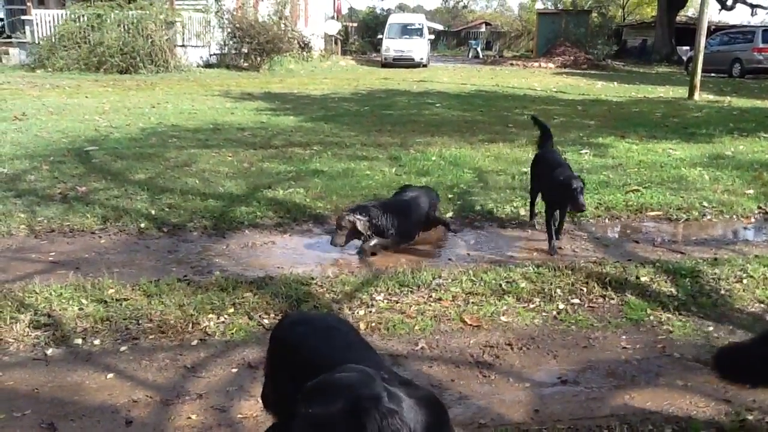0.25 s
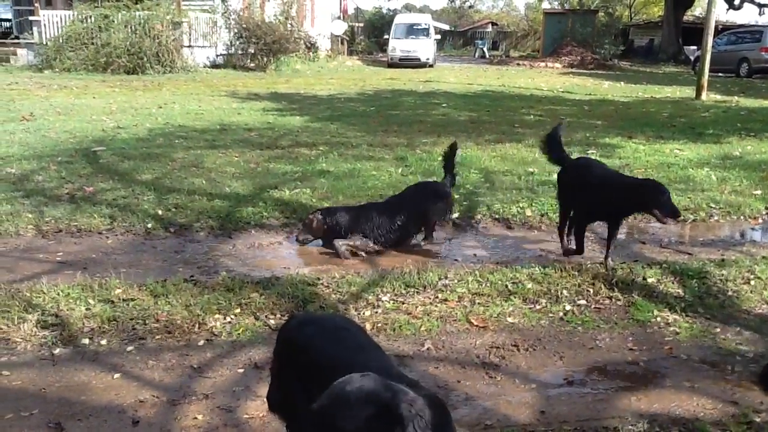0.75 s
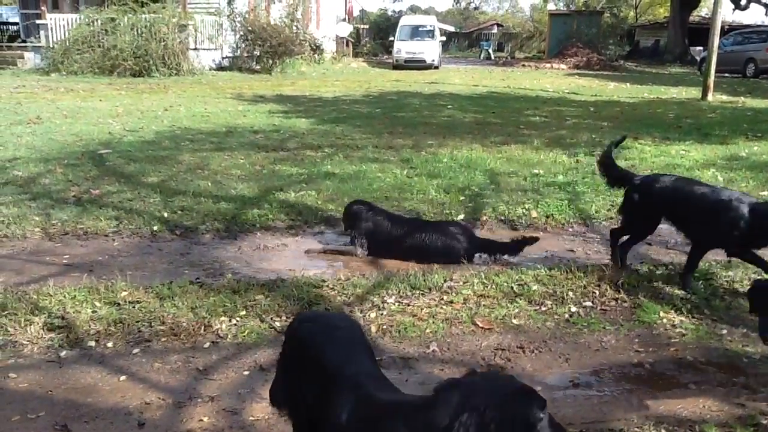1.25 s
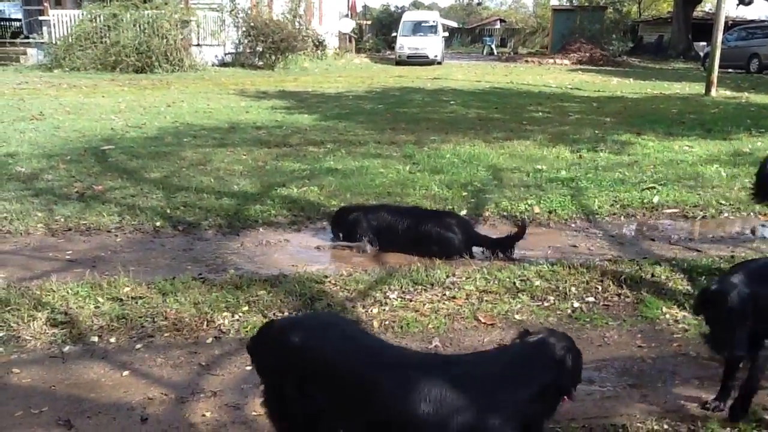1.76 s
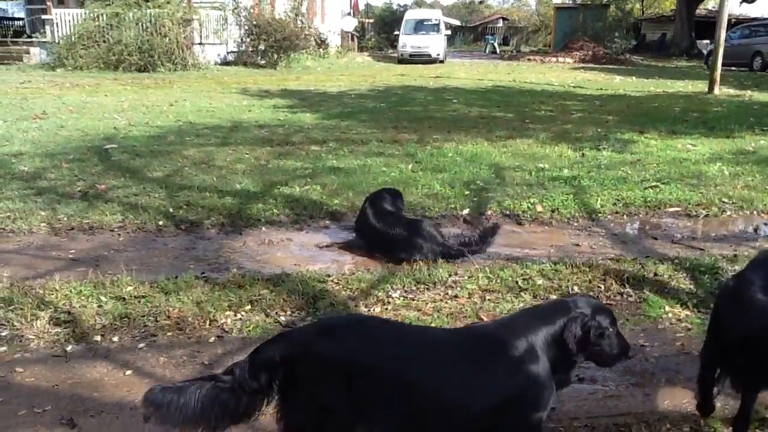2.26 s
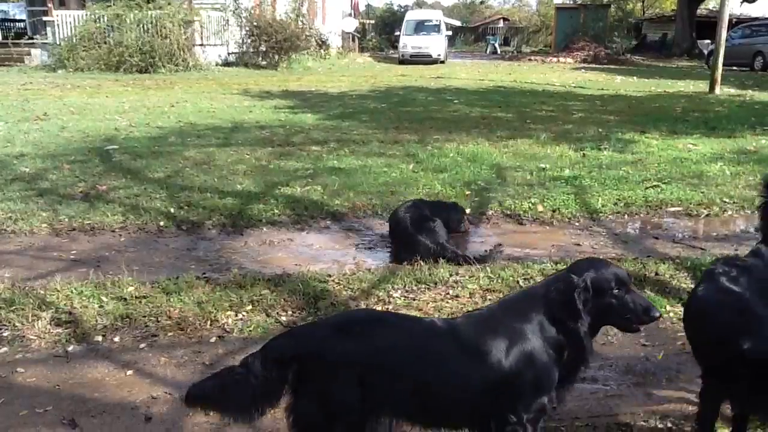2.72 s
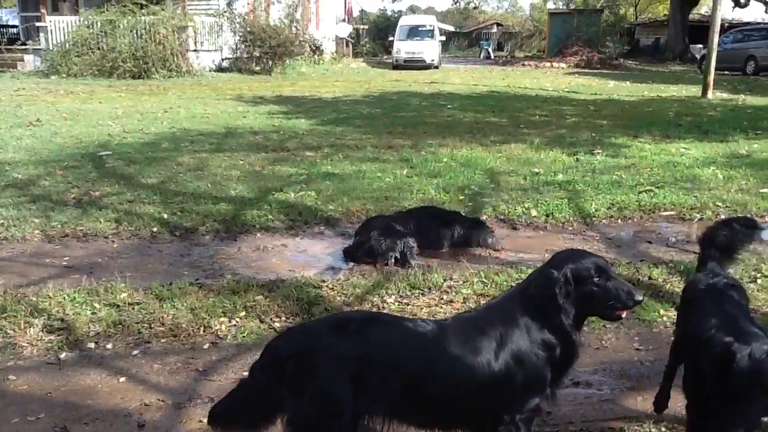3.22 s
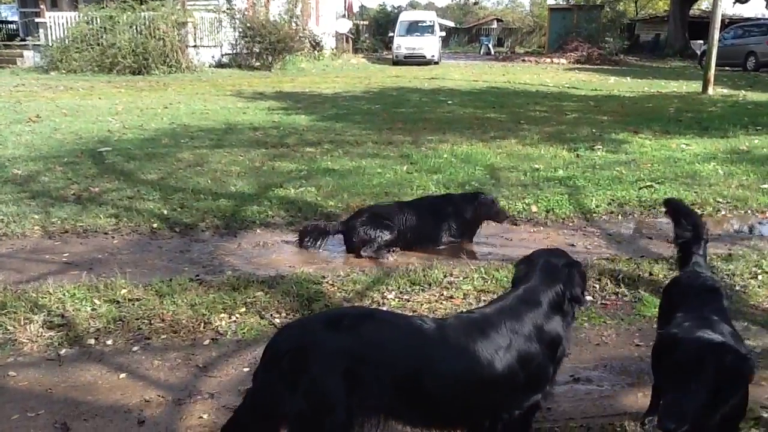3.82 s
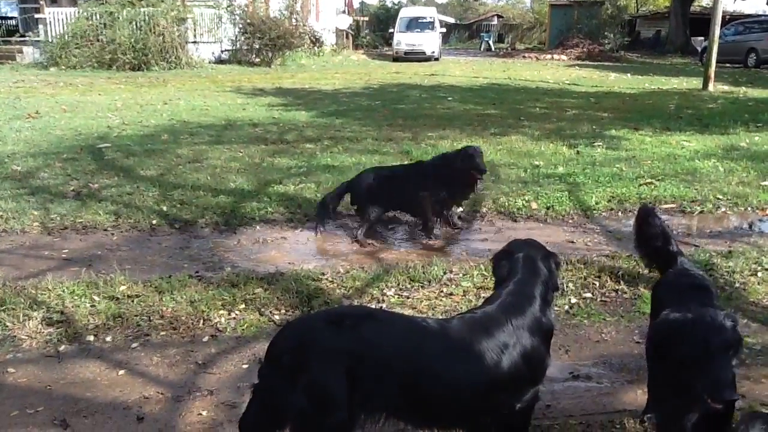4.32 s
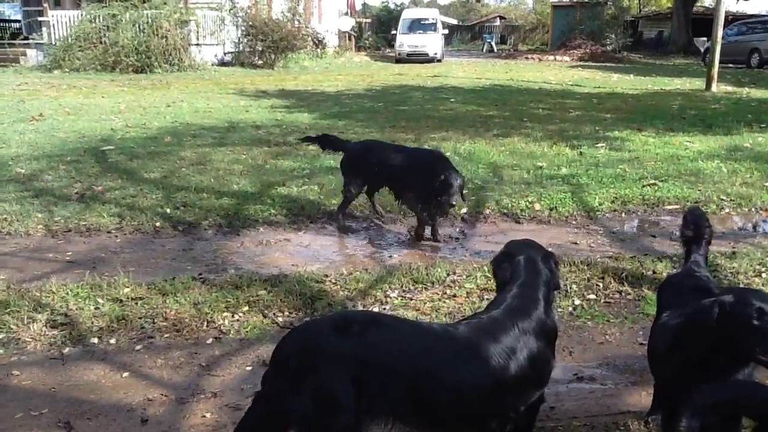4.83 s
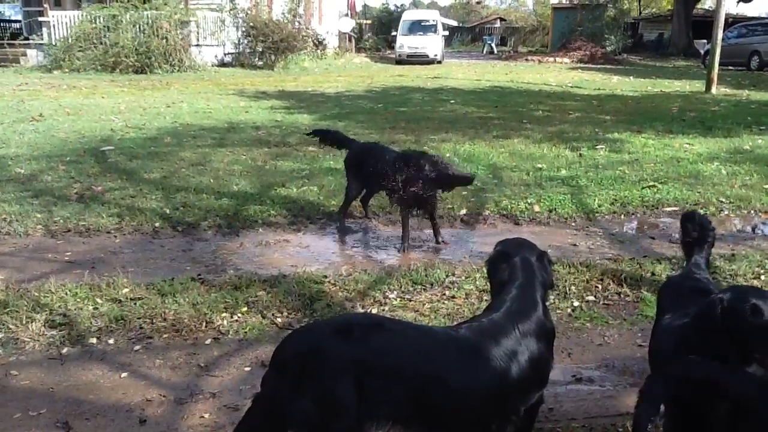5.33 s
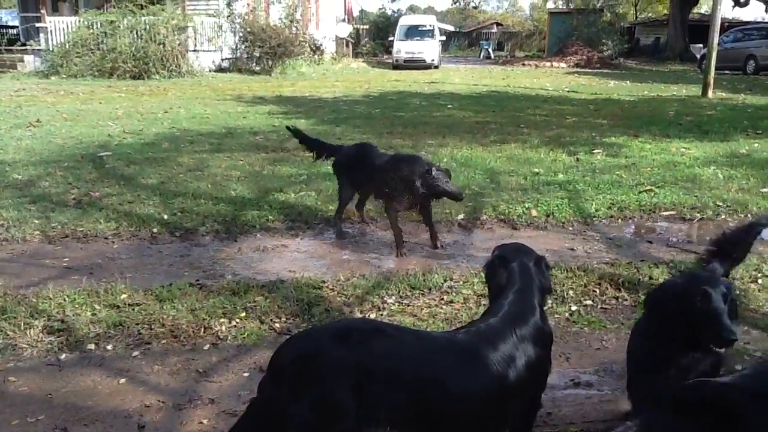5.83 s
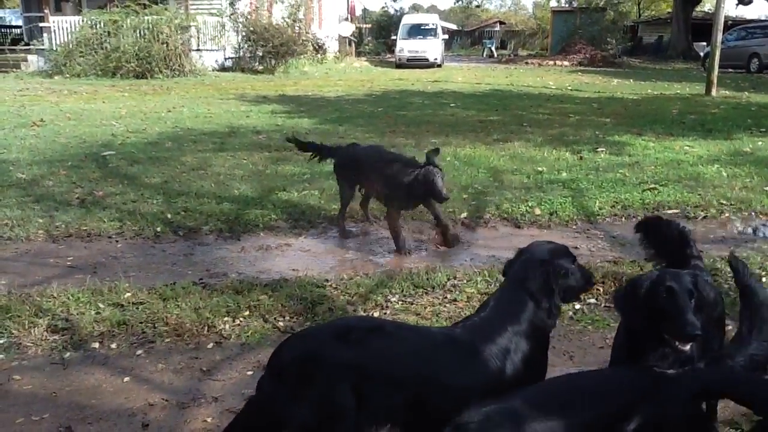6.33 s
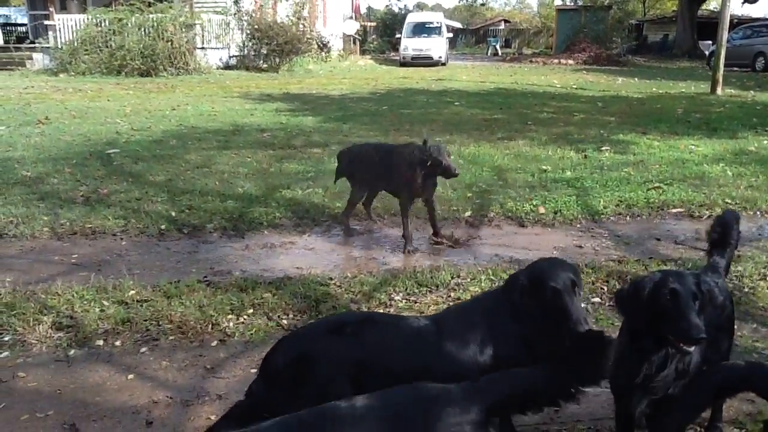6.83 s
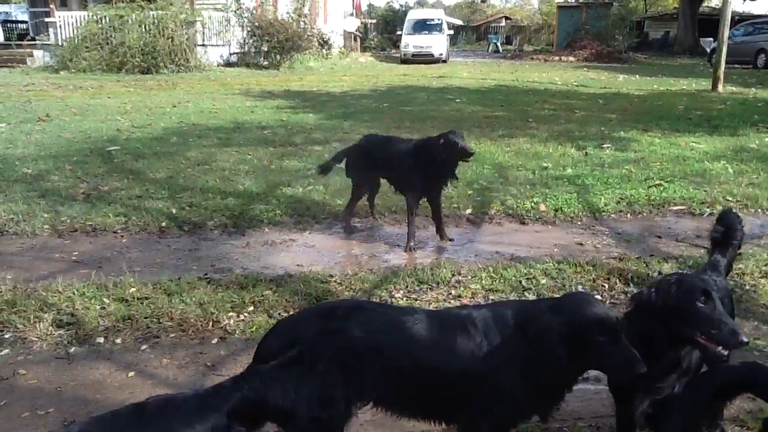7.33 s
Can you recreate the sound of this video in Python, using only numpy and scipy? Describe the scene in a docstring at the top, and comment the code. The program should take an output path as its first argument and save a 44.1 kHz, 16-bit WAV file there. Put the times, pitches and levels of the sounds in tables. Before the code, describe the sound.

Sparse wet slaps, plops and drips from a dog wallowing in mud, then fast ear-and-coat flapping with flung spray, outdoors.

```python
"""On a lawn, a dog wallows in a shallow muddy puddle and shakes itself a few metres from a small microphone.
A quiet outdoor hush of filtered noise lies under streams of tiny bubble tones that fizz as water is churned.
Low plops and paw thuds are gliding tones with slosh noise; drips are rising tones, ticks short bright noise.
One snort is noise through nose resonances. Slaps and flaps are volleys of drops with a crack, thump and spray.
The microphone port colours the hush, the bubbles and the cracks and spray."""
import sys
import numpy as np
from scipy import signal
from scipy.io import wavfile
from scipy.ndimage import uniform_filter1d

SR = 44100
rng = np.random.default_rng(int(sys.argv[2]) if len(sys.argv) > 2 else 0)


def wrap_up_sound(samples):
    """Save the sound to the file named by the first command line argument, as 16-bit audio."""
    columns = np.atleast_2d(samples).T
    # keep every value between -1 and 1, then stretch to whole-number steps
    tamed = np.clip(columns, -1, 1)
    steps = np.round(tamed * 32767).astype(np.int16)
    wavfile.write(sys.argv[1], SR, steps)


N = 333616  # length in samples

# low plops of paws and body: (time [s], peak level [dB], nominal pitch [Hz])
PLOPS = [(0.45, -45, 368), (2.179, -37, 238), (2.195, -40, 370), (2.201, -25, 191), (2.259, -37, 164),
         (2.314, -35, 318), (2.341, -38, 333), (2.429, -39.5, 367), (2.842, -47.5, 173), (3.522, -40, 328),
         (4.689, -36.5, 291), (4.726, -35.5, 358), (4.737, -37, 340), (5.646, -46, 244), (5.88, -32.5, 406),
         (6.33, -49, 220), (6.437, -44, 189), (6.543, -47, 205), (6.742, -29.5, 288), (6.939, -44, 209)]
# wet ears and coat flapping as the dog shakes:
# (time [s], peak level of the crack [dB], pitch of the trapped air [Hz], spray against that peak [dB rms])
FLAPS = [(5.526, -36, 1480, -13), (5.65, -35.5, 2100, -4), (5.77, -38, 2100, -21),
         (5.88, -27.5, 1600, -7.5), (5.94, -35, 2270, -12), (5.996, -25.5, 2680, -23),
         (6.1144, -26, 1860, -21), (6.231, -37.5, 2000, -11), (6.304, -43, 2170, -10),
         (6.337, -40, 2130, -16), (6.346, -30, 2270, -15), (6.399, -40, 2250, -26), (6.4411, -43, 2270, -4),
         (6.529, -36, 2500, -6.5), (6.5467, -28.5, 1970, -16), (6.588, -40, 2290, -11),
         (6.649, -28.5, 2220, -16), (6.7412, -28, 1710, -10), (6.761, -38.5, 2200, -5),
         (6.842, -28, 2220, -15), (6.9134, -27, 2100, -10), (6.9366, -26.5, 2270, -15.5),
         (7.025, -27, 2160, -18), (7.08, -40, 2300, -14), (7.1173, -35.5, 2350, -18),
         (7.185, -43, 1700, -23), (7.239, -48, 2240, -2)]
LEAD_S = 0.01  # the first drops of a slap or flap come this long before its crack


def gain_of(db):
    """Turns decibels into a factor."""
    return 10 ** (np.asarray(db) / 20)


def evened(x):
    """Scales to an rms of 1."""
    return x / np.sqrt(np.mean(x ** 2) + 1e-20)


def peaked(x):
    """Scales to a peak of 1."""
    return x / (abs(x).max() + 1e-12)


def fullest(x):
    """Scales so that the loudest 6 ms have an rms of 1."""
    return x / np.sqrt(uniform_filter1d(x ** 2, size=265).max() + 1e-20)


def add(mix, s, sound):
    """Mixes a sound in at a time in seconds."""
    part = mix[round(s * SR):][:len(sound)]
    part += sound[:len(part)]


def passed(x, hz, kind):
    """Gentle low-pass or high-pass."""
    return signal.sosfilt(signal.butter(2, hz, kind, fs=SR, output="sos"), x)


def passed_twice(x, hz, kind):
    """The same filter two times over, for a steeper slope."""
    return passed(passed(x, hz, kind), hz, kind)


def port(x):
    """The small opening of the microphone favours some pitches; the filter never sounds ahead of its input."""
    # colour of the microphone port: (frequency [Hz], gain [dB])
    colour = [(18, -58), (30, -43), (120, -4.5), (177, 0), (269, 1), (589, -5.5), (1260, -9), (1550, -6),
              (1950, -3), (2330, -1), (2750, -8.5), (3210, -11.5), (4400, -10.5), (5560, -15),
              (7040, -15.5), (14200, -27.5), (15400, -25)]
    f, db = np.transpose(colour)
    hz = abs(np.fft.fftfreq(2 ** 13, 1 / SR))
    gain_db = np.interp(np.log(hz + 1), np.log(f), db)
    log_gain = np.log(gain_of(np.maximum(gain_db, -100)))
    # the Hilbert transform finds the phase that puts the response as early as possible
    spectrum = np.exp(np.conj(signal.hilbert(log_gain)))
    taps = np.fft.ifft(spectrum).real[:2 ** 11]
    return signal.oaconvolve(x, taps)[..., :x.shape[-1]]


def hush(level_db, patchy_db):
    """Distant wind, leaves and traffic: smooth noise with faint drifting patches."""
    frames = N // 128 + 5
    a, b, patches = rng.standard_normal((frames, 257, 3)).T
    patches = uniform_filter1d(patches, size=8, axis=0)  # blur over frequency
    patches = evened(uniform_filter1d(patches, size=16, axis=1))  # blur over time
    patch_share = np.minimum(np.arange(257) / 12, 1)[:, None]  # less patchy towards the bass
    spectrogram = (a + 1j * b) * gain_of(patchy_db * patches * patch_share)
    noise = signal.istft(spectrogram, nperseg=512, noverlap=384)[1][:N]
    return gain_of(level_db) * evened(port(noise))


def yard(x, t60, delay_s):
    """Faint scatter from bodies, ground and trees: sparse taps of random sign that die quickly."""
    t = np.arange(round(0.3 * SR)) / SR
    sparse = rng.standard_normal(len(t)) * (rng.random(len(t)) < 0.05)
    taps = sparse * gain_of(-60 * t / t60) * (t > delay_s)
    return signal.oaconvolve(x, taps / np.linalg.norm(taps))[:N]


def bubbles(low_hz, high_hz, per_s, size_db, cycles):
    """A steady stream of small bursting bubbles of uneven size, each a short tone rising in pitch."""
    t, out = np.arange(600) / SR, np.zeros(N)
    size = gain_of(size_db * np.minimum(rng.exponential(1, N), 5))
    size = size * (rng.random(N) < per_s / SR)  # bursts at random moments
    pitches = np.geomspace(low_hz, high_hz, num=8)
    kind = rng.integers(0, len(pitches), N)
    for k, hz in enumerate(pitches):
        tone = np.sin(2 * np.pi * hz * t * (1 + 0.0082 * hz * t))
        fade = np.exp(-hz * t / cycles) * (1 - np.exp(-hz * t))
        out += signal.oaconvolve(size * (kind == k), tone * fade * hz ** 0.74)[:N]
    out = port(out)
    return out / np.sqrt(uniform_filter1d(out ** 2, size=3000) + 1e-20)  # keep the level steady


def swells():
    """Every stir of the water as (centre [s], half length [s], levels of large, middling, tiny bubbles [dB])."""
    # gushes of churned water:
    # (centre [s], half length [s], level of middling bubbles [dB], tiny bubbles against that level [dB])
    gushes = [(0.28, 0.021, -55, -3), (0.46, 0.022, -51, -5), (0.88, 0.035, -56.5, 0.5),
              (1.024, 0.021, -50, -4), (1.286, 0.019, -48, -4.5), (1.617, 0.029, -54, -6),
              (2.023, 0.034, -50.5, -1.5), (2.218, 0.023, -45, -14), (2.311, 0.05, -43.5, -2.5),
              (2.664, 0.064, -52, -6.5), (2.853, 0.013, -44.5, -4), (3.207, 0.044, -48, 0),
              (3.475, 0.14, -52.5, -24), (4.3, 0.042, -50.5, 3), (4.716, 0.021, -45.5, 0),
              (5.688, 0.027, -52, 3.5), (6.318, 0.038, -52, 4)]
    # burst of drops flung by each flap: (large, middling, tiny [dB against the peak of the flap])
    fling_db = [-44, -21, -22]
    off = -120
    rows = []
    for s, half, db, fizz_db in gushes:
        gurgle_db = db - 15 - 0.34 * fizz_db  # the less fizz, the more large bubbles
        rows.append((s, half, [gurgle_db, db, db + fizz_db]))
    for s, db, _ in PLOPS:  # each plop frees large bubbles
        rows.append((s + 0.014, 0.0088, [-35.5 + 0.57 * db, off, off]))
    for s, db, *_ in FLAPS:
        rows.append((s + 0.012, 0.008, np.add(fling_db, db)))
    rows.append((6.8, 0.83, [-63.5, -56, -54.5]))  # rain of drops from the shaking coat
    return rows


def churn(calm_db, lumpy_db):
    """Each stir swells and fades, raising the streams of large, middling and tiny bubbles by its own shares."""
    now = np.arange(0, N + 64, 64) / SR
    power = gain_of(calm_db)[:, None] ** 2
    for s, half, levels_db in swells():
        swell = np.exp(-abs((now - s) / half) ** 2)
        power = power + gain_of(levels_db)[:, None] ** 2 * swell
    # water breaks in clumps about 10 ms long that all bubble sizes share
    lumps = evened(uniform_filter1d(rng.standard_normal(len(now)), size=7))
    lumps = evened(gain_of(lumpy_db * lumps))
    streams = (bubbles(751, 1379, 700, 1.5, cycles=7.0),
               bubbles(1655, 2784, 900, 2.0, cycles=3.1),
               bubbles(3050, 12500, 2500, 1.6, cycles=0.5))
    water = np.zeros(N)
    for stream, p in zip(streams, power):
        water += stream * np.interp(np.arange(N) / SR, now, np.sqrt(p) * lumps)
    return passed(water, 135, "high")


def plop(db, hz, t60, glide_per_s):
    """A cavity in water or mud closes: a few low cycles that swell, glide in pitch and carry a broad slosh."""
    t = np.arange(round(0.2 * SR)) / SR
    # the tone starts at 0.855 of its nominal pitch and moves by twice the glide a second
    turn = 2 * np.pi * hz * t * (0.855 + glide_per_s * t)
    swell = (1 - np.exp(-t / 0.012)) ** 3 * gain_of(-60 * t / t60)
    slosh = passed_twice(rng.standard_normal(len(t)), 0.6 * hz, "high")
    slosh = evened(passed_twice(slosh, 600, "low"))
    cavity = np.sin(turn) + 0.16 * np.sin(1.95 * turn)
    return gain_of(db) * peaked(passed((cavity + 0.32 * slosh) * swell, 57, "high"))


def add_thuds(mix):
    """Soft paw thuds on the mud close by: plops whose pitch sags at first."""
    # (time [s], peak level [dB], nominal pitch [Hz])
    thuds = [(7.343, -45.5, 191), (7.535, -44, 190)]
    for s, db, hz in thuds:
        add(mix, s, plop(db, hz, t60=0.1, glide_per_s=-6.5))


def add_plops(mix):
    """Paws and body close cavities in the water; harder plops die in fewer cycles."""
    for s, db, hz in PLOPS:
        cycles = max(5.5 - 0.12 * (db + 42.5), 2)  # cycles of the nominal pitch in a 60 dB decay
        add(mix, s, plop(db, hz, cycles / hz, glide_per_s=8.4))


def drip(db, hz):
    """One bubble rings briefly as it nears the surface, its pitch climbing by 0.31 octave."""
    u = np.linspace(0, 1, round(11.47 * SR / hz))  # 0 at the start, 1 at the end
    wobble = 1 + 0.5 * rng.standard_normal(12)  # uneven loudness
    pitch = hz * 2 ** (0.31 * (u - 0.5))
    tone = np.sin(2 * np.pi * np.cumsum(pitch) / SR) * np.sin(np.pi * u ** 0.7)
    return gain_of(db) * tone * np.interp(u, np.linspace(0, 1, len(wobble)), wobble)


def add_drips(mix):
    """Single drips, each one ringing bubble."""
    # (time [s], level before the uneven loudness [dB], pitch halfway [Hz])
    drips = [(0.447, -39, 4830), (.864, -38, 2180), (.885, -32.5, 2240), (1.258, -42, 732),
             (1.259, -38.5, 3600), (1.2648, -31, 4360), (2.199, -34, 2050), (2.343, -48, 727),
             (2.348, -44, 990), (2.283, -40, 2400), (2.295, -38, 2200), (3.022, -40, 4700),
             (4.523, -36, 4000), (4.565, -39.5, 6800), (4.726, -25, 1734), (4.73, -30.5, 2710),
             (4.73, -33, 1140), (7.24, -35.5, 2260), (7.062, -36, 6050)]
    for s, db, hz in drips:
        add(mix, s, drip(db, hz))


def tick(db, low_hz):
    """A fleck of spray bursts: a few milliseconds of bright noise."""
    t = np.arange(round(0.02 * SR)) / SR
    fade = gain_of(-60 * t / 0.014) * np.minimum(t / 0.0004, 1)
    burst = passed_twice(rng.standard_normal(len(t)) * fade, low_hz, "high")
    return gain_of(db) * peaked(passed(burst, 5800, "low"))


def add_ticks(mix):
    """Bright ticks of fine spray."""
    # (time [s], peak level [dB], corner of the high-pass [Hz])
    ticks = [(0.839, -32.5, 3450), (.8704, -37, 6000), (2.62, -39, 4000), (4.328, -38, 3500),
             (6.527, -30, 3000)]
    for s, db, low_hz in ticks:
        add(mix, s, tick(db, low_hz))


def add_snort(mix):
    """Rough air through nose resonances that climb as the breath is forced out and then drop back."""
    # the breath: (time [s], level [dB])
    breath = [(4.631, -68), (4.645, -45.5), (4.685, -53), (4.7, -41), (4.722, -40.5), (4.745, -47),
              (4.79, -51)]
    # resonances of nose and throat: (frequency at rest [Hz], level against the others [dB])
    resonances = [(910, -1), (1600, 1.5), (2080, -4), (2480, -2.5)]
    s, db = np.transpose(breath)
    t = np.arange(s[0], s[-1], 1 / SR)
    # around the strongest breath the resonances climb by 6 times their pitch a second
    stretch = np.interp(t, s[3:6], [1, 1 + 6 * (s[4] - s[3]), 1])
    air, out = rng.standard_normal(len(t)), 0
    r = np.exp(-np.pi * 190 / SR)  # each resonance is two passes, each 190 Hz wide
    for hz, peak_db in resonances:
        # shift the resonance down to 0 Hz, filter there and shift back, so it can move
        turn = np.exp(2j * np.pi * np.cumsum(hz * stretch) / SR)
        ringing = turn * signal.lfilter([1], [1, -2 * r, r * r], air / turn)
        out = out + gain_of(peak_db) * evened(ringing.real)
    add(mix, s[0], gain_of(np.interp(t, s, db)) * evened(out))


def slap(db, hz, thump_db, spray_db, lead, hold_s, blow, chance):
    """First drops gather, a sheet of water cracks, spatters in dying drops and rings a pocket of air."""
    t = np.arange(chance.shape[1]) / SR - LEAD_S  # 0 at the crack
    dying = gain_of(-60 * np.maximum(t - hold_s, 0) / 0.024)
    shape = np.where(t < 0, lead * np.exp(t / 0.0025), dying)
    drops = chance[0] * (abs(chance[1]) > 1.8) * shape  # only a few samples carry a drop
    drops[round(LEAD_S * SR)] += blow

    ring = np.arange(500) / SR
    pocket = np.sin(2 * np.pi * hz * ring) * np.exp(-hz * ring / 1.8)
    crack = port(drops + 0.13 * np.convolve(drops, pocket)[:len(t)])
    crack = passed(passed_twice(crack, 1.02 * hz, "high"), 4200, "low")

    thump_band = signal.butter(5, [900, 1600], "band", fs=SR, output="sos")
    thump = signal.sosfilt(thump_band, drops)

    spray = passed_twice(chance[2], 2900, "high") * shape ** 0.85 * (0.4 + abs(chance[1]))
    spray = port(passed_twice(spray, 6800, "low"))
    parts = peaked(crack) + gain_of(thump_db) * fullest(thump) + gain_of(spray_db) * fullest(spray)
    return gain_of(db) * parts


def add_blows(mix, table, base_thump_db, lead, hold_s, blow):
    """Adds a table of slaps or flaps; larger pockets of air, lower in pitch, thump more."""
    for (s, db, hz, spray_db), chance in zip(table, rng.standard_normal((len(table), 3, 3000))):
        thump_db = base_thump_db + 6.5 * np.log2(2200 / hz)  # 6.5 dB an octave below 2200 Hz
        add(mix, s - LEAD_S, slap(db, hz, thump_db, spray_db, lead, hold_s, blow, chance))


def add_slaps_and_flaps(mix):
    """Paws and body slap the water, then ears and coat flap; flesh thumps more than water."""
    # slaps on the water:
    # (time [s], peak level of the crack [dB], pitch of the trapped air [Hz], spray against that peak [dB rms])
    slaps = [(0.2556, -30, 1860, -13.5), (0.8805, -33, 2100, -18), (0.8952, -30, 2090, -39),
             (0.9006, -32, 1000, -26), (1.2627, -11, 2400, -24.5), (2.1006, -28.5, 2170, -25),
             (2.2184, -35, 2010, -34), (2.244, -29, 2250, -26), (2.2563, -26.5, 2380, -27),
             (2.2618, -34.5, 2360, -7.5), (2.3514, -34, 2310, -19), (2.359, -34, 2100, -17),
             (2.7467, -32, 2210, -23), (2.8423, -34.5, 2220, -7), (3.197, -34, 2500, -11),
             (3.2035, -24, 2900, -27), (3.363, -37, 2300, -11), (3.462, -34, 2210, -25),
             (3.4994, -31.5, 2390, -37), (3.5336, -34.5, 1640, -16), (4.2785, -22, 2220, -29.5),
             (4.2853, -27, 2660, -24), (4.5166, -37.5, 2280, -14), (4.7275, -27, 1220, -44)]
    # lead: level of the first drops against the later ones; hold_s: time at full level;
    # blow: strength of the first blow against the drops
    add_blows(mix, slaps, base_thump_db=-30, lead=0.35, hold_s=0.0008, blow=6)
    add_blows(mix, FLAPS, base_thump_db=-16.5, lead=0.42, hold_s=0.002, blow=3)


def scene():
    """Water events, their scatter, the churn and the hush, alike in both channels."""
    water = np.zeros(N)
    add_slaps_and_flaps(water)
    add_drips(water)
    add_ticks(water)
    add_snort(water)
    mono = water + gain_of(-17) * yard(water, t60=0.07, delay_s=0.006)
    add_plops(mono)
    add_thuds(mono)
    mono += churn(calm_db=[-68, -58, -66], lumpy_db=3.0)  # calm water: large, middling, tiny bubbles
    mono += hush(level_db=-52, patchy_db=2.0)
    return np.array([mono, mono])


def record(dry):
    """A steep low-pass takes away the treble above about 15 kHz."""
    taps = signal.firwin(1501, 15360, window=("kaiser", 9), fs=SR)
    return signal.oaconvolve(dry, taps[None], "same")


dry = scene()
out = record(dry)
wrap_up_sound(out)
```